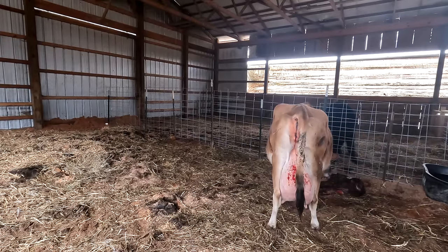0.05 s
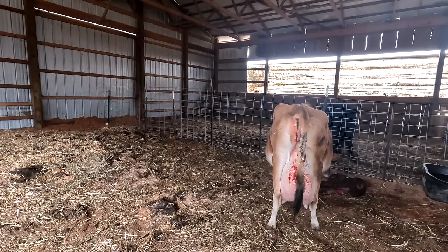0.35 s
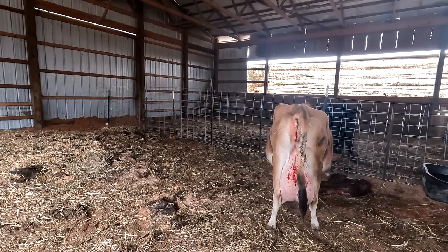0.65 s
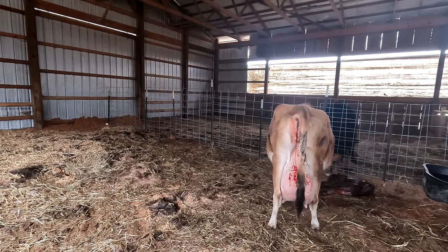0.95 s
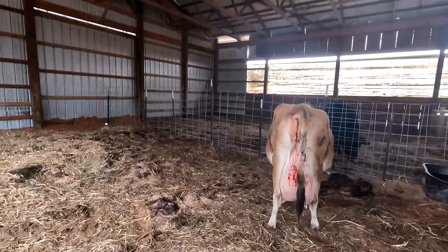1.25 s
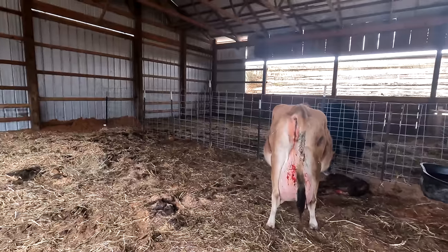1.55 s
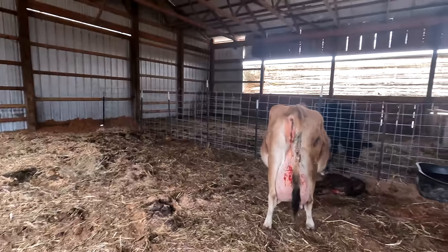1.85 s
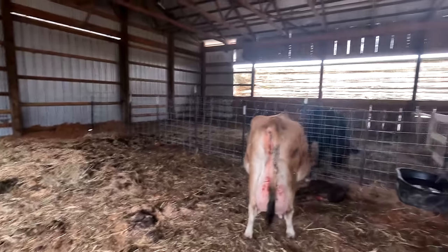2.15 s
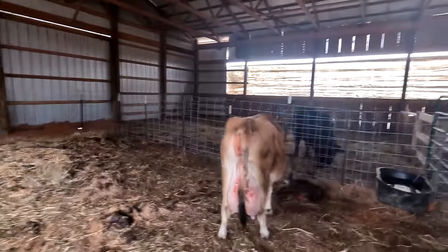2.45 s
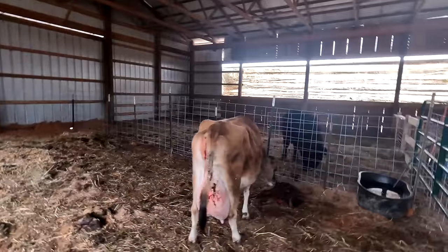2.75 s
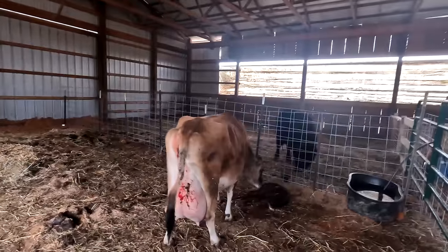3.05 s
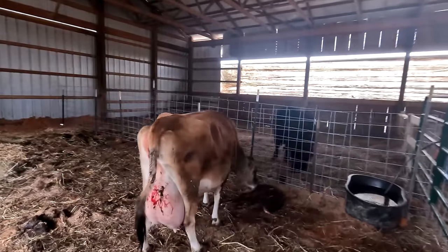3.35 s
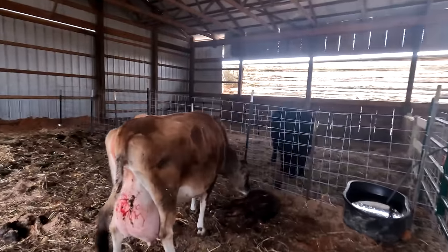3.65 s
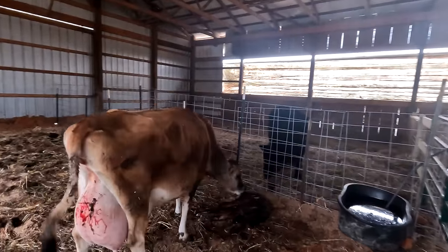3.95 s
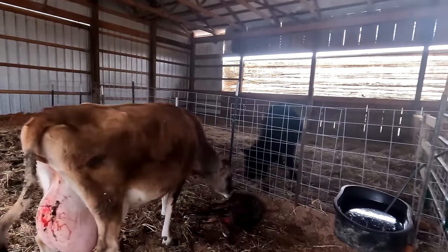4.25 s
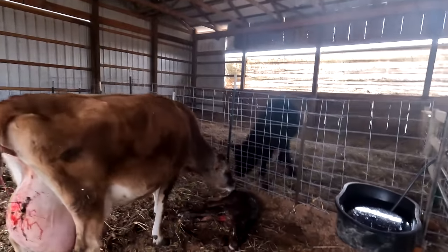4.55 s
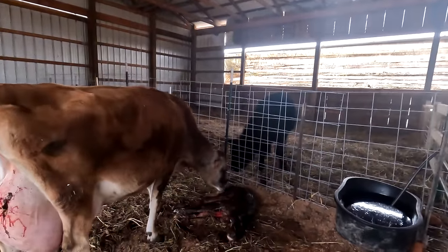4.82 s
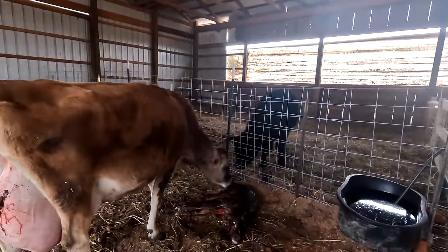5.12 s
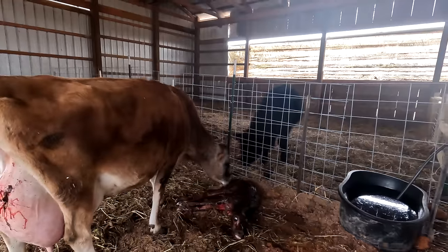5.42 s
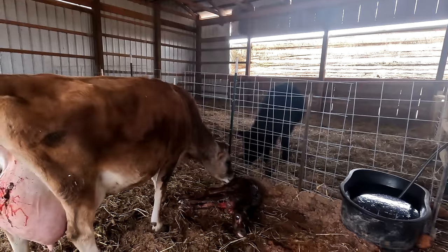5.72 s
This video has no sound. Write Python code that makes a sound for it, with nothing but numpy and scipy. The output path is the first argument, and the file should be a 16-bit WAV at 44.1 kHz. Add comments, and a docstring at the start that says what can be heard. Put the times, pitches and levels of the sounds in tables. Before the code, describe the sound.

A cow snorts through wet nostrils and gives a single quiet, low moo inside a barn with a short echo. Deep wind rumble builds on the microphone, along with a few handling thumps, as someone walks through straw and stalks snap. More snorts follow, then a short rattle from a wire pen and some dull footfalls. Two strong snorts and a last thump come toward the end.

```python
"""Open metal barn, a hand-held camera walking up to a cow that stands over her newborn calf.
She sniffs, snorts through wet nostrils and, just before 1 s, hums one soft closed-mouth low.
Steps then rustle through the straw, moving air rumbles on the microphone and the grip bumps it twice.
She sniffs and snorts on; near 3.4 s the wire pen clanks, and near 5 s come her loudest snorts and a
third bump. A brief soft hiss ends it. The sheet walls give cow, pen and snapping stalks a short tail."""
import sys
import numpy as np
from scipy import signal
from scipy.fft import rfft, irfft
from scipy.io import wavfile
from scipy.ndimage import uniform_filter1d, minimum_filter1d

SR = 44100
rng = np.random.default_rng(int(sys.argv[2]) if len(sys.argv) > 2 else 0)


def store_wav(level_fs):
    """Save 16-bit WAV to argv[1]."""
    pcm = np.round(np.clip(np.atleast_2d(level_fs), -1, 1) * 32767)
    wavfile.write(sys.argv[1], SR, pcm.T.astype(np.int16))


N = 259308


def undb(db):
    """Decibels to gain."""
    return 10 ** (np.asarray(db) / 20)


def unit(x):
    """Scale to rms 1."""
    return x / np.sqrt(np.mean(x ** 2))


def curve(rows, column=1):
    """One column of a table, joined by straight lines in time."""
    rows = np.asarray(rows)
    return np.interp(np.arange(N) / SR, rows[:, 0], rows[:, column])


def swell(rows, column=1, fade_s=0.15):
    """Gain from a dB column, fading out beyond the table's ends."""
    t = np.arange(N) / SR
    outside_s = np.maximum(rows[0][0] - t, 0) + np.maximum(t - rows[-1][0], 0)
    return undb(curve(rows, column)) * np.exp(-outside_s / fade_s)


def envelope(start_s, hold_s, attack_s, sag_db_per_s, fall_db_per_s):
    """Gain of one push: a rise, a slow sag while it is held, then a steady fall."""
    age = np.maximum(np.arange(N) / SR - start_s, 0)
    drop_db = sag_db_per_s * np.minimum(age, hold_s) + fall_db_per_s * np.maximum(age - hold_s, 0)
    return np.minimum(age / attack_s, 1) * undb(-drop_db)


def colour(x, spectrum):
    """Give a signal a smooth spectrum, at rms 1."""
    hz, db = np.transpose(spectrum)
    f = np.maximum(np.fft.rfftfreq(N, 1 / SR), 1)
    gain = undb(np.interp(np.log(f), np.log(hz), db))
    return unit(irfft(rfft(x) * gain, N))


def hiss(spectrum):
    """Turbulent noise of a given colour."""
    return colour(rng.standard_normal(N), spectrum)


def wander(rate_hz):
    """Smooth random drift round zero, with a new target rate_hz times a second."""
    hold = max(int(SR / rate_hz), 2)
    targets = np.repeat(rng.standard_normal(N // hold + 1), hold)
    return 0.84 * uniform_filter1d(uniform_filter1d(targets, hold), hold)[:N]


def crackle(per_s, spread_db):
    """Random tiny clicks, most small and a few large."""
    size = undb(spread_db * np.minimum(rng.exponential(size=N), 5))
    return unit((rng.random(N) < per_s / SR) * size * rng.standard_normal(N))


def band(x, lo_hz, hi_hz):
    """Gentle band-pass."""
    return signal.sosfilt(signal.butter(2, [lo_hz, hi_hz], "band", fs=SR, output="sos"), x)


def add(out, start_s, x, peak_db):
    """Mix in a short sound at a time and peak level."""
    i = int(start_s * SR)
    out[i:i + len(x)] += (undb(peak_db) * x / np.abs(x).max())[:N - i]


def bursts(rows, width):
    """Short contacts: each a dying puff of noise round its own pitch."""
    out, t = np.zeros(N), np.arange(SR // 4) / SR
    for start_s, peak_db, centre_hz, t60_s in rows:
        puff = rng.standard_normal(len(t)) * undb(-60 * t / t60_s)
        add(out, start_s, band(puff, centre_hz / (1 + width), centre_hz * (1 + width)), peak_db)
    return out


def reverberate(x, tail):
    """Smear a sound through a tail scaled to energy 1."""
    return signal.fftconvolve(x, tail / np.sqrt(np.sum(tail ** 2)))[:N]


# Spectrum of the air all round the barn: frequency_hz, relative_db
HUSH_COLOUR = [(90, 2), (150, -2), (250, -3.5), (390, -6.5), (500, -9.5), (720, -11), (880, -8.5),
               (1100, -15.5), (1420, -17.5), (2060, -21), (3300, -22), (5800, -26.5), (7000, -33),
               (15500, -39.5)]


def outdoor_hush(level_db=-54.5):
    """Dull outdoor hush coming through the open side."""
    return band(hiss(HUSH_COLOUR), 45, 21050) * undb(level_db + 0.67 * wander(2.01))


# First echoes off the ground and the near wall: delay_s, level_db
WALL_ECHOES = [(.0043, -22), (.0079, -18), (0.0144, -15.5)]


def barn(x, wet_db, t60_s=0.28, treble_t60_s=0.29):
    """Nearby surfaces echo the mids at once; the sheet walls add a short tail."""
    t = np.arange(SR) / SR
    lows = band(rng.standard_normal(SR), 274.4, 2800) * undb(-60 * t / t60_s)
    highs = band(rng.standard_normal(SR), 4000, 10000) * undb(-60 * t / treble_t60_s)
    build_up = np.clip((t - 0.006) / 0.033, 0, 1)
    mids = band(x, 980, 6000)
    early = sum(undb(db) * np.pad(mids, (int(delay_s * SR), 0))[:N] for delay_s, db in WALL_ECHOES)
    return x + early + undb(wet_db) * reverberate(x, (lows + highs) * build_up)


def roof(x, wet_db, t60_s=0.842, rise_s=0.0317):
    """The metal roof overhead keeps the mids ringing a little longer."""
    t = np.arange(SR) / SR
    tail = band(rng.standard_normal(SR), 900, 2600) * undb(-60 * t / t60_s)
    return x + undb(wet_db) * reverberate(x, tail * np.minimum(t / rise_s, 1))


def gusts(spectrum, eddy_s):
    """Turbulent pressure whose strength is even over an eddy's lifetime."""
    pressure = hiss(spectrum)
    return pressure / np.sqrt(uniform_filter1d(pressure ** 2, int(eddy_s * SR)) + 0.051)


# Spectra of slow eddies and quick buffeting at the microphone: frequency_hz, relative_db
EDDY_COLOUR = [(3, -3.5), (10, 6.5), (22, 0), (32, -11), (45, -21), (65, -40.5), (100, -39), (200, -63),
               (500, -106.5)]
BUFFET_COLOUR = [(25, 2), (50, 13), (70, 7), (95, -3), (130, -6.5), (180, -14.5), (260, -26), (400, -32.5),
                 (800, -89.5), (2000, -97)]
# Strength of the air moving across the microphone: time_s, eddy_db, buffet_db
WIND = [(0, -39, -53), (.86, -51.5, -63), (.96, -24, -43), (1.14, -39, -44), (1.3, -16.5, -39),
        (1.55, -20.5, -69), (2.3, -15.5, -38), (2.65, -23, -70), (2.95, -17.5, -39), (3.25, -18, -39),
        (3.6, -19, -23.5), (3.9, -14.5, -31), (4.15, -19, -38), (4.4, -14.5, -26.5), (4.95, -16.5, -26),
        (5.48, -14.5, -41), (5.7, -18, -22.5), (5.88, -12, -33)]
# Sudden puffs straight on the microphone: centre_s, level_db, half_length_s
PUFFS = [(2.954, -33, 0.02), (3.371, -24.5, 0.015), (3.478, -31, 0.0216), (3.62, -25.5, 0.022),
         (3.812, -20, 0.015), (4.301, -23, 0.026), (4.859, -21, 0.026), (4.938, -18, 0.034)]


def wind(buffet_trim_db=-1):
    """Large slow eddies press on the microphone; smaller ones buffet it when the air is fast or puffs."""
    t = np.arange(N) / SR
    puffs = sum(undb(db) * np.exp(-((t - centre_s) / half_s) ** 2) for centre_s, db, half_s in PUFFS)
    eddies = gusts(EDDY_COLOUR, eddy_s=0.14) * swell(WIND)
    buffets = gusts(BUFFET_COLOUR, eddy_s=0.0616) * (swell(WIND, column=2) + puffs)
    return eddies + undb(buffet_trim_db) * buffets


# The grip on the camera, right at the microphone: start_s, peak_db, pitch_hz, rise_s, knock_db
BUMPS = [(1.258, -3.5, 20.7, 0.008, -46), (2.308, -4, 19, 0.0074, -28.5), (5.286, -2, 26, 0.0017, -19)]


def grip_bumps(swing_t60_s=0.19, body_hz=134.4, body_t60_s=0.12, thud_hz=296, thud_t60_s=0.022):
    """Each bump pushes the diaphragm in to swing back slowly; the camera body rings and thuds."""
    out, t = np.zeros(N), np.arange(SR // 2) / SR
    thuds = []
    for start_s, peak_db, pitch_hz, rise_s, knock_db in BUMPS:
        push = 1 - np.exp(-(t / rise_s) ** 2)
        swing = -np.sin(2 * np.pi * pitch_hz * t) * undb(-60 * t / swing_t60_s)
        ring = np.sin(2 * np.pi * body_hz * t) * undb(-60 * t / body_t60_s)
        add(out, start_s, push * swing, peak_db)
        add(out, start_s, push * ring, knock_db)
        thuds.append((start_s, knock_db - 6.5, thud_hz, thud_t60_s))
    return out + bursts(thuds, width=0.6)


# Steps through the straw below the microphone: start_s, relative_db, hold_s
STEPS = [(1.199, -77, 0.077), (2.12, -68.5, 0.17), (2.3, -63.5, 0.1), (2.804, -66, .06), (3.03, -65, 0.13),
         (3.41, -65.5, 0.055), (3.609, -55.5, 0.1), (3.766, -62.5, 0.26), (4.1, -63, 0.22),
         (4.514, -67.5, 0.072), (4.686, -62.5, 0.089), (4.866, -61.5, 0.39), (5.28, -71.5, 0.09)]


def footwork(walking_db=-70.5):
    """How hard the straw is stirred: each step presses it down, over the light rustle of walking."""
    walking = envelope(start_s=1.66, hold_s=3.26, attack_s=0.44, sag_db_per_s=0, fall_db_per_s=84)
    stir = undb(walking_db) * walking
    for start_s, db, hold_s in STEPS:
        step = envelope(start_s, hold_s, attack_s=0.054, sag_db_per_s=1.5, fall_db_per_s=84)
        stir = np.hypot(stir, undb(db) * step)
    return stir


# Spectrum of the straw rubbing underfoot: frequency_hz, relative_db
STRAW_COLOUR = [(200, -9), (400, 2.5), (700, 3.5), (950, 1), (1400, -3), (2200, -2), (3300, -0.5),
                (5500, -2), (7500, -9), (11000, -8.5), (15500, -13.5)]


def straw(gain_db=7, grain_db=-2, crunch_db=-8, flicker_db=2.2):
    """Stalks rub with a fine hiss as the feet shift; thicker ones crunch lower down."""
    grains = rng.standard_normal(N) + undb(grain_db) * crackle(per_s=1300, spread_db=2)
    crunch = unit(band(crackle(per_s=400, spread_db=2), 900, 5000))
    rustle = colour(grains, STRAW_COLOUR) + undb(crunch_db) * crunch
    return rustle * footwork() * undb(gain_db + flicker_db * wander(50))


# Stalks snapping or swishing, and wet spatter, close by: start_s, peak_db, centre_hz, t60_s
SNAPS = [(.301, -50, 5900, .02), (.343, -36.5, 2510, .034), (1.268, -48, 2480, 0.053),
         (1.511, -49, 3640, 0.81), (2.081, -44.5, 3250, 0.039), (2.162, -32, 4110, 0.0077),
         (2.563, -40, 2200, 0.052), (2.653, -32.5, 3850, 0.0224), (2.672, -29.5, 3820, 0.029),
         (3.848, -42, 4100, 0.026), (4.389, -41.5, 1960, 0.016), (4.475, -43, 2550, 0.11),
         (4.727, -40.5, 3260, 0.052), (4.897, -34.5, 4930, .06), (4.961, -44.5, 9000, .008),
         (5.027, -41, 9000, 0.013), (5.519, -50, 4900, .015), (5.742, -47.5, 1870, 0.0215)]


def snaps(faint_count=14, faint_db=-54.5, spread_db=4, faint_hz=4420, faint_t60_s=0.022):
    """Single stalks give way: the listed snaps, and fainter ones scattered in time, size and pitch."""
    faint = []
    for slot, (when, size, pitch) in enumerate(rng.random((faint_count, 3))):
        start_s = (slot + when) / faint_count * N / SR
        peak_db = faint_db + spread_db * (2 * size - 1)
        faint.append((start_s, peak_db, faint_hz * 2 ** (pitch - 0.5), faint_t60_s))
    return bursts(faint, width=0.32) + bursts(SNAPS, width=0.4)


# Dull knocks: the first follows the grip's first bump, the rest are feet and hooves on the barn floor: start_s,
# peak_db, centre_hz, t60_s
KNOCKS = [(1.293, -48.5, 643, .04), (2.353, -45, 750, 0.0225), (3.33, -40.5, 228, .3),
          (3.42, -39.5, 314.4, 0.69), (3.665, -44, 626, 0.059), (3.891, -38, 840, 0.0194),
          (3.92, -38.5, 298, 0.28), (4.584, -49.5, 530, 0.022), (5.375, -39, 544, 0.044)]


def footfalls():
    """Feet and hooves land with dull knocks; one more knock follows the first bump."""
    return bursts(KNOCKS, width=0.29)


# Quick blows on the wire pen that make up one clank: start_s, peak_db, brightest_hz
CLANKS = [(3.32, -44, 1114), (3.347, -37, 2880), (3.376, -41, 3000), (3.403, -33, 1900), (3.421, -38, 2000),
          (3.448, -43.5, 2000), (3.472, -44, 2600)]
# Resonances of the pen's panel: pitch_hz, relative_db, t60_s
PEN_MODES = [(350, -8, .3), (870, -7, .12), (940, 0, .3), (1020, 0, .25), (1126, -9, .08), (1390, -12, .05),
             (1740, -12, .07), (1900, -12, .07), (2330, -9, .04), (2580, -13, .07), (3720, -15, .2)]


def wire_pen(scrape_s=0.0023, blur=0.04, contact_db=-5):
    """A loose wire panel chatters against its post; its many unequal wires blur each resonance."""
    out, t = np.zeros(N), np.arange(SR // 2) / SR
    for start_s, peak_db, brightest_hz in CLANKS:
        ring = 0
        for pitch_hz, mode_db, t60_s in PEN_MODES:
            wobble = 1 + blur * wander(283)[:len(t)]
            phase = 2 * np.pi * np.cumsum(pitch_hz * wobble) / SR
            ring = ring + undb(mode_db - 60 * t / t60_s) * np.sin(phase)
        contact = band(rng.standard_normal(len(t)) * np.exp(-t / scrape_s), 873, brightest_hz)
        panel = unit(signal.fftconvolve(contact, ring)[:len(t)])
        add(out, start_s, panel + undb(contact_db) * unit(contact), peak_db)
    return out


# Resonances inside the cow's nose: centre_hz, width_hz, lift_db (multiplied by depth)
NOSE_RESONANCES = [(890, 140, 2), (1125, 110, 2), (1360, 87, -0.5), (1584, 250, 2), (2495, 96, 3.5),
                   (2730, 180, 1), (3540, 160, 4.5), (3860, 73, 3.5)]


def nose(x, depth=1):
    """The long nasal passages lift a few narrow bands of the rushing air."""
    f = np.fft.rfftfreq(N, 1 / SR)
    lift_db = sum(db / (1 + (2 * (f - hz) / width_hz) ** 2) for hz, width_hz, db in NOSE_RESONANCES)
    return unit(irfft(rfft(x) * undb(depth * lift_db), N))


# Three sniffs from the cow, then a brief soft hiss as the sound ends: start_s, level_db, hold_s
SOFT_HISSES = [(0.032, -52.5, 0.019), (1.603, -51, 0.096), (1.73, -52, 0.0335), (5.837, -53, .05)]
# Spectrum of these hollow hisses: frequency_hz, relative_db
SOFT_HISS_COLOUR = [(200, -13), (600, -3), (900, 1.5), (1200, -1.5), (1600, 0.5), (2200, -1), (3900, -6.5),
                    (4700, -15.5), (7000, -26), (14000, -57)]


def soft_hisses(trim_db=-1):
    """The cow draws in her calf's scent with a hollow hiss; a brief hiss like it comes at the very end."""
    gain = 0
    for start_s, db, hold_s in SOFT_HISSES:
        gain += undb(db) * envelope(start_s, hold_s, attack_s=0.017, sag_db_per_s=14, fall_db_per_s=105)
    return undb(trim_db) * nose(hiss(SOFT_HISS_COLOUR), depth=1.57) * gain


# Spectrum of air leaving the nostrils: frequency_hz, relative_db
EXHALE_COLOUR = [(90, -14.5), (170, 1), (300, -4), (500, -2.5), (700, -1), (900, -0.5), (1200, -2),
                 (2000, -4.5), (2700, -4.5), (3800, -7.5), (4500, -13), (6000, -18.5), (15000, -46)]


def exhale(low_gain, high_gain, spatter_db=-3, split_hz=1800, flutter_db=1.1):
    """Air jets out of the wet nostrils, which flutter and spatter; narrowing them brightens the jet."""
    wet_air = rng.standard_normal(N) + undb(spatter_db) * crackle(per_s=700, spread_db=3.5)
    jet = nose(colour(wet_air, EXHALE_COLOUR))
    lows = signal.sosfiltfilt(signal.butter(2, split_hz, fs=SR, output="sos"), jet)
    return (lows * low_gain + (jet - lows) * high_gain) * undb(flutter_db * wander(160))


# The cow's snorts over the calf, in front of the microphone, and two soft breath puffs as her low begins (0.66
# s, 0.80 s): start_s, level_db, hold_s, brightness_db
SNORTS = [(0.332, -41.5, 0.118, 3), (0.658, -51.5, 0.037, -4), (0.803, -58.5, 0.056, -19),
          (2.565, -40.5, 0.05, -0.5), (2.636, -41, 0.12, 0), (4.874, -35, 0.23, -0.5),
          (5.122, -38, 0.1, 3.5)]


def snorts():
    """Each snort bursts out, sags while the cow pushes, then dies away."""
    low_gain, high_gain = 0, 0
    for start_s, db, hold_s, brightness_db in SNORTS:
        push = undb(db) * envelope(start_s, hold_s, attack_s=0.027, sag_db_per_s=35, fall_db_per_s=102)
        tilt = undb(brightness_db / 2)
        low_gain = np.maximum(low_gain, push / tilt)
        high_gain = np.maximum(high_gain, push * tilt)
    return exhale(low_gain, high_gain)


# The cow's one low, a few steps from the microphone: time_s, pitch_hz, effort_db
MOO = [(.645, 98.8, -59.5), (.75, 106.1, -42.5), (.87, 113.8, -42), (.93, 119.2, -39.5),
       (1.045, 119, -39.5), (1.074, 125.9, -33.5), (1.092, 126, -69)]
# What her throat and closed mouth pass: frequency_hz, gain_db
THROAT = [(98, -9), (120, 3), (210, -1.5), (240, -4.5), (355, -15.5), (480, -19.5), (590, -24), (710, -16),
          (835, -13.5), (950, -26), (1100, -46), (1300, -51), (1700, -36), (2000, -36)]


def moo(harmonics=17, jitter=0.0042, shimmer_db=0.9, air_pulsing=0.17, air_effort_cap_db=-39):
    """Vocal folds hum through the closed mouth; air puffs through the nose once a cycle."""
    pitch_hz, effort = curve(MOO), swell(MOO, column=2)
    phase = 2 * np.pi * np.cumsum(pitch_hz * (1 + jitter * wander(44.7))) / SR
    throat_hz, throat_db = np.transpose(THROAT)
    voice = 0
    for k in range(1, harmonics + 1):
        gain = undb(np.interp(k * pitch_hz, throat_hz, throat_db) - shimmer_db * wander(25.2))
        voice = voice + gain * np.sin(k * phase + rng.uniform(0, 2 * np.pi))
    air = exhale(low_gain=undb(-25), high_gain=undb(-21)) * (1 + air_pulsing * np.cos(phase))
    return voice * effort + air * np.minimum(effort, undb(air_effort_cap_db))


def scene():
    """One microphone: cow and pen sound in the barn; wind and bumps act on the microphone itself."""
    airy = roof(barn(snorts() + soft_hisses(), wet_db=-18), wet_db=-17.5)
    voice = barn(moo(), wet_db=-9.5)
    clatter = barn(wire_pen() + snaps() + footfalls(), wet_db=-11.5)
    return (airy + voice + clatter + straw() + outdoor_hush() + wind() + grip_bumps())[None]


def record(dry, ceiling=0.8, top_hz=15700):
    """The camera's limiter briefly turns down any peak over the ceiling; then the top is cut."""
    window = SR // 100
    needed_gain = np.minimum(1, ceiling / np.maximum(np.abs(dry), 1e-9))
    gain = uniform_filter1d(minimum_filter1d(needed_gain, window), window)
    return signal.sosfilt(signal.ellip(10, 0.1, 80, top_hz, fs=SR, output="sos"), dry * gain)


dry = scene()
out = record(dry)
store_wav(out)
```